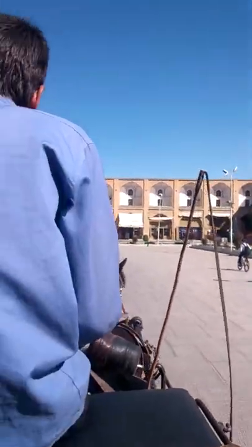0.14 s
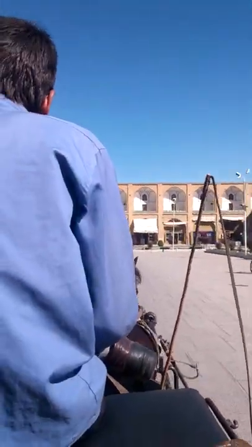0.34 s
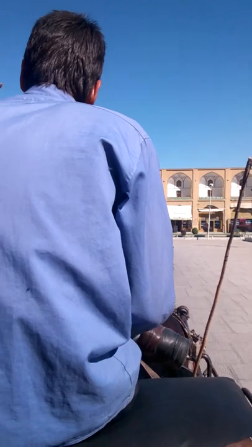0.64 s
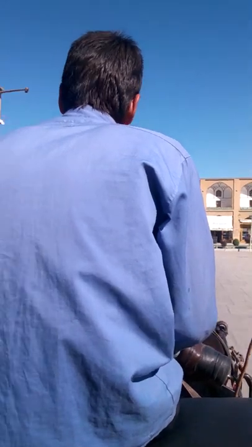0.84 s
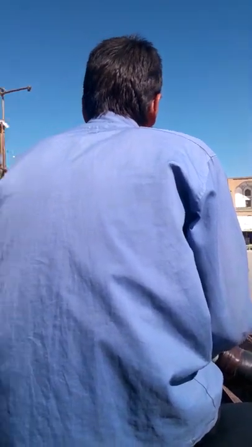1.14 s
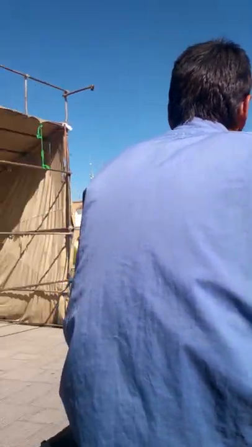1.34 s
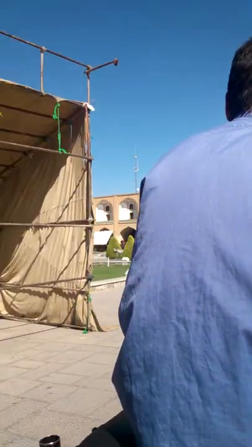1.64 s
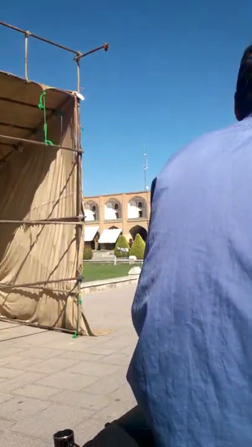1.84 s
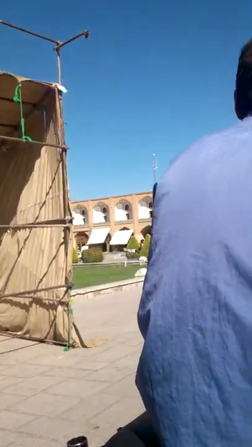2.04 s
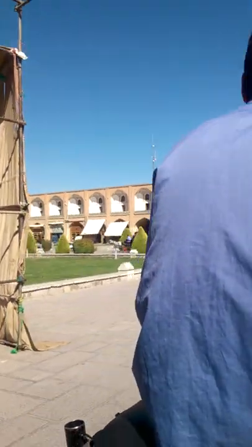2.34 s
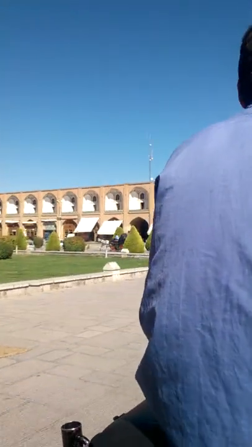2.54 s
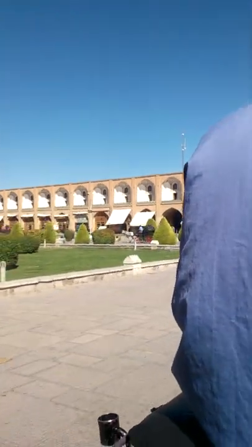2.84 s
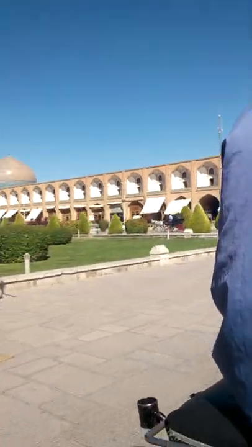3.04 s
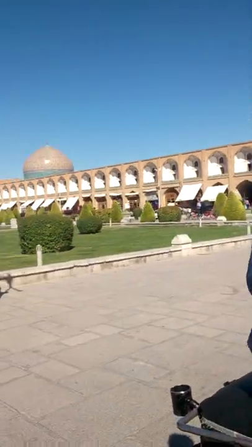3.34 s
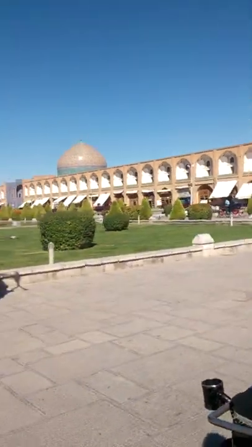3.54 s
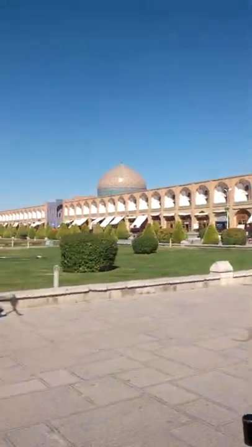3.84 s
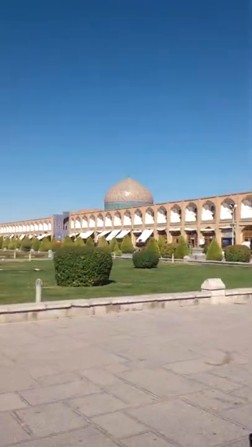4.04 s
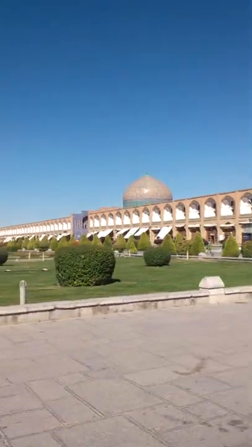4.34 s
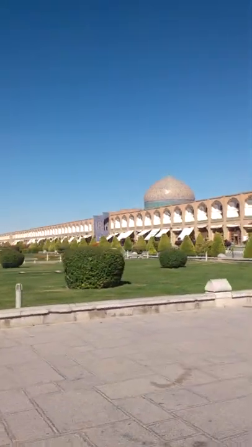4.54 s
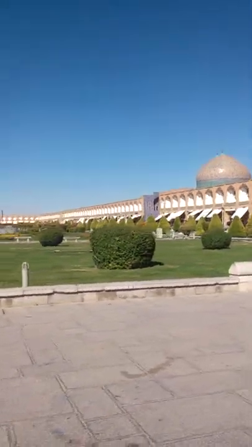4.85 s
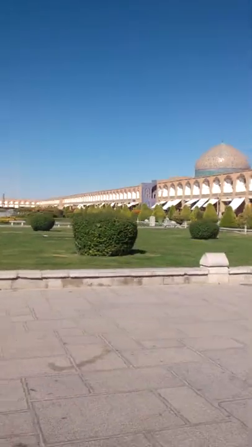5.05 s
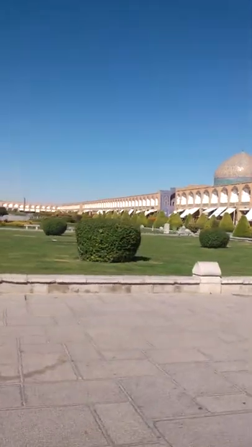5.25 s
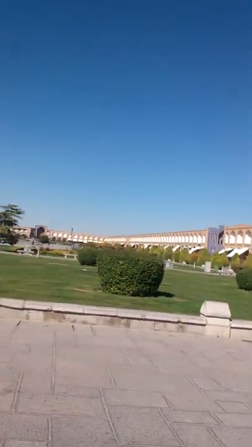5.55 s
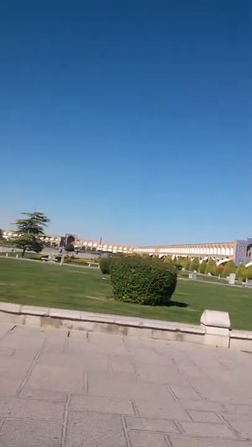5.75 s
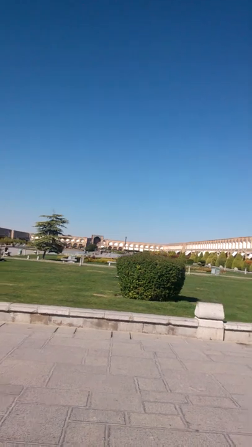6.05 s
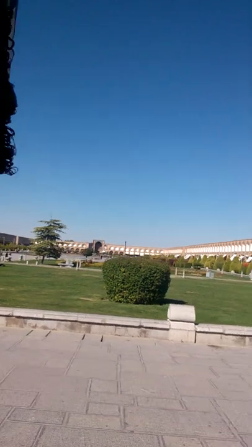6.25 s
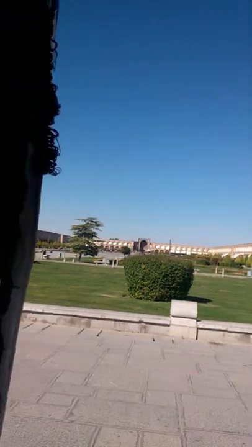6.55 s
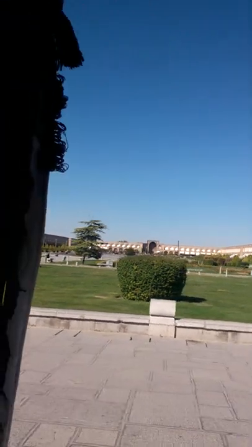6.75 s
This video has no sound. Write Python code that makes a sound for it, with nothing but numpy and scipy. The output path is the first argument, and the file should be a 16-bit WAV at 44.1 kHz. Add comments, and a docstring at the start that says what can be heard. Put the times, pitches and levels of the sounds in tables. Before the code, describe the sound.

A horse carriage rolls outdoors across stone paving, heard close from the passenger seat in stereo. Bright, dry bells and fine metal glints shake without pause above quick uneven clopping. Deep wind buffets either side of the microphone, heavily at first, then more sparsely. Gritty wheel noise over a soft low roll brings sharp pebble cracks on the right, the hardest near the end, while everything continues to the cut.

```python
"""A horse carriage rolls over stone paving, heard at a left and a right port, in wind from the start.
Six harness bells of decaying modes jingle at once over chinking chains; ringing hooves clop from 0.1 s.
Eddies, short low swings, thump at the ports most thickly before 3 s. From 1.1 s pebbles snap under the
right wheel, as short bursts of three fast-fading tones with noisy crumbs, in noise grit over a low roll;
the hardest snap comes near 5.7 s, the grit swells up to 6 s, and bells, steps and wind go on to the end."""
import sys
import numpy as np
from scipy import signal
from scipy.fft import rfft, irfft, next_fast_len
from scipy.io import wavfile
from scipy.ndimage import uniform_filter1d, map_coordinates

SR = 44100
rng = np.random.default_rng(int(sys.argv[2]) if len(sys.argv) > 2 else 0)


def generate_wav(signal):
    """Clip the signal to [-1, 1] and save it as 16-bit WAV at the path in sys.argv[1]."""
    frames = np.transpose(np.atleast_2d(signal))
    scaled = np.clip(frames, -1, 1) * 32767
    pcm = np.round(scaled).astype(np.int16)
    wavfile.write(sys.argv[1], SR, pcm)


N = 304290


def amp(db):
    """Gain of a level in dB."""
    return 10 ** (np.asarray(db) / 20)


def unit(x):
    """Each channel at rms 1."""
    return x / np.sqrt(np.mean(x ** 2, -1, keepdims=True) + 1e-20)


def curves(rows):
    """One value per sample for each column after the time."""
    s, *cols = np.transpose(rows)
    return [np.interp(np.arange(N) / SR, s, c) for c in cols]


def sides(pan_db):
    """Left and right gains that share a fixed power, from the left-right level in dB."""
    left = 1 / (1 + amp(-2 * np.asarray(pan_db)))
    return 2 * np.sqrt([left, 1 - left])


def wobble(rate):
    """A smooth random curve per port, rate knots a second."""
    knots = rng.standard_normal((2, int(N * rate / SR) + 4))
    return np.array([map_coordinates(k, [np.arange(N) * rate / SR]) for k in knots])


def filtered(x, response):
    """x times a response of frequency."""
    m = next_fast_len(N + 8192)
    return irfft(rfft(x, m) * response(np.fft.rfftfreq(m, 1 / SR)), m)[..., :N]


def coloured(x, spectrum):
    """x shaped by (Hz, dB) points on a log axis, rms 1."""
    f, db = np.transpose(spectrum)
    return unit(filtered(x, lambda hz: amp(np.interp(np.log(hz + 1), np.log(f), db))))


def add(track, s, sound):
    """Mixes a stereo sound in at s seconds."""
    part = track[:, max(round(s * SR), 0):][:, :sound.shape[1]]
    part += sound[:, :part.shape[1]]


# footfalls: (time [s], level [dB], hollow pitch [Hz], relative shoe ring [dB])
FOOTFALLS = [(0.097, -38, 1030, -19), (0.117, -35, 1070, -19), (0.266, -36, 1020, -20),
             (0.372, -38, 960, 19.5), (0.392, -30.5, 1140, 13), (0.672, -32.5, 956, -33),
             (0.78, -38, 800, -21), (0.968, -32.5, 990, -30), (1.26, -38, 890, -19), (1.425, -33, 676, -14),
             (1.554, -35, 1500, 6), (1.833, -30, 996, -6), (1.878, -33.5, 745, -24),
             (2.141, -43.5, 796, 12), (2.435, -31.5, 923, -18), (2.491, -37, 830, -16),
             (2.695, -44, 810, -23), (3.007, -34.5, 970, -21), (3.181, -34.5, 820, -23),
             (3.277, -32, 1170, -15), (3.35, -35.5, 900, 3), (3.585, -34, 1030, -25),
             (3.61, -35.5, 850, -20), (3.775, -35, 840, -23), (3.863, -36, 814, -10),
             (3.981, -37.5, 850, -21), (4.164, -34.5, 1034, -25), (4.196, -38, 840, -23),
             (4.343, -36.5, 694, -21), (4.433, -33, 1284, -24), (4.733, -38, 1030, -17),
             (5.008, -36.5, 1250, -28), (5.29, -35, 990, 2), (5.537, -39, 974, -8.5), (5.58, -31, 1270, 5),
             (5.86, -34, 950, -29), (5.882, -41, 1030, -29), (6.156, -30, 1230, -25),
             (6.444, -35, 940, -36), (6.594, -36.5, 966, -14), (6.727, -29.5, 1250, -21)]
# a shoe slides on the stone: (time [s], level [dB], length [s])
SHOE_SKIDS = [(0.364, -30, 0.044), (1.405, -37, 0.072), (1.829, -30, 0.027), (3.582, -36, 0.026),
              (4.424, -41, .04), (5.961, -37, 0.064), (6.154, -34, 0.023)]
SHOE_HZ, SHOE_T60 = 1774, 0.15  # shoe ring: pitch [Hz], decay by 60 dB [s]
HOOF_PAN_DB, STRAY_DB = 6.5, 10  # the horse is a little to the left; single steps stray from it
HEEL_S, HEEL_DB, HEEL_PITCH = 0.012, 3.5, 0.66  # the heel lands first [s], level [dB], pitch ratio


def hooves():
    """The hollow hoof rings for a few cycles, stone gives a puff, the shoe a short note; some steps skid."""
    out, t = np.zeros((2, N)), np.arange(SR // 8) / SR
    puff_band = signal.butter(N=2, Wn=[550, 2000], btype="band", fs=SR)
    for s, db, hz, shoe_db in FOOTFALLS:
        hollow = 1.6 * np.sin(2 * np.pi * hz * t)
        hollow += 0.4 * np.sin(2 * np.pi * rng.uniform(1.3, 1.6) * hz * t)
        hollow += 0.5 * np.sin(2 * np.pi * rng.uniform(0.55, 0.75) * hz * t)
        clop = amp(-60 * t / 0.034) * hollow
        heel = amp(HEEL_DB - 60 * t / 0.013) * np.sin(2 * np.pi * HEEL_PITCH * hz * t)
        clop += 0.14 * np.pad(clop, (rng.integers(60, 300), 0))[:len(t)]  # the shoe rocks once
        grains = rng.standard_normal((2, len(t))) * (0.6 + 5 * (rng.random(len(t)) < 0.02))
        puff_shape = amp(-60 * t / 0.2) * (1 - np.exp(-t / 0.0023))
        puff = 1.4 * puff_shape * signal.lfilter(*puff_band, grains)
        scrape_shape = amp(-60 * t / 0.031) * (1 - np.exp(-t / 0.0043))
        scrape = 0.11 * scrape_shape * rng.standard_normal((2, len(t)))
        shoe = amp(shoe_db - 15.0 - 60 * t / SHOE_T60) * np.sin(2 * np.pi * SHOE_HZ * t)
        rise = 1 - np.exp(-t / 0.0007)
        gain = amp(db) * sides(rng.normal(HOOF_PAN_DB, STRAY_DB))[:, None] * rise
        add(out, s - HEEL_S, gain * (heel + 0.5 * puff[::-1]))  # the reversed puff swells
        add(out, s, gain * (clop + puff + scrape + shoe))
    skid_band = signal.butter(N=2, Wn=[900, 6000], btype="band", fs=SR)
    for s, db, length in SHOE_SKIDS:
        grains = rng.standard_normal((2, len(t))) * (0.5 + 4 * (rng.random(len(t)) < 0.03))
        arch = np.sqrt(np.abs(np.sin(np.pi * np.clip(t / length, 0, 1))))
        add(out, s, amp(db) * arch * signal.lfilter(*skid_band, grains))
    return out


# modes of each of the six bells: (pitch [Hz], ...)
BELL_MODE_HZ = [
    [3050, 3092, 3140, 8247, 8680, 12900, 13175, 14095, 15000],
    [2182, 2250, 4983, 7497, 9272],
    [4142, 7860],
    [3647],
    [2785, 2494],
    [10585],
]
# how these modes ring, bell by bell: (relative level [dB], decay by 60 dB [s], left-right [dB])
BELL_MODES = [
    [(4.5, 0.039, -6.5), (4, 0.12, -7), (-5, 0.095, 14), (0.5, 0.18, -11), (1, 0.067, -4), (-7, 0.06, 4),
     (-7, 0.12, 7), (-1, 0.14, 1), (-13, 0.05, -3)],
    [(-1.5, 0.26, 7), (-1, 0.069, -25), (-8.5, 0.13, -6), (-5, 0.31, -14), (3.5, 0.017, 20)],
    [(4.5, 0.061, -4), (-18, 0.063, -16)],
    [(5.5, 0.071, -4)],
    [(11.5, 0.12, -4), (-9, 0.12, -27)],
    [(7.5, 0.088, 8)],
]
# clear blows of the pellet, bell by bell: (time [s], level [dB]);
# the first bell also has (overtone brightness [dB])
PELLET_BLOWS = [
    [(0.0154, -22.5, -17), (0.1705, -24.5, -3.5), (0.1835, -21.5, -5), (0.2334, -32, 3), (0.2488, -30, -18),
     (0.2952, -29, -11), (0.3346, -26, -24), (0.4414, -24, -7), (0.5676, -26.5, -9), (0.629, -33, -15),
     (0.728, -29.5, -5), (0.7562, -21, -3), (0.7826, -20, -3), (0.8375, -21.5, -11), (0.8689, -48, -2),
     (0.9063, -32.5, -7.5), (1.058, -33, -5), (1.2979, -31, -20), (1.3134, -22.5, -7), (1.352, -25, -2),
     (1.4346, -35, -3), (1.4696, -37, -10), (1.6003, -18.5, -15.5), (1.645, -29, -18), (1.7544, -23, -29),
     (1.7828, -33, -10), (1.915, -30, -17), (1.926, -24, -0.5), (2.0098, -28.5, -11), (2.0467, -24, -32),
     (2.0797, -21, -14.5), (2.118, -36, -17), (2.2114, -32.5, -19), (2.3291, -37, -10), (2.3456, -24, -15),
     (2.4099, -25.5, -7.5), (2.5152, -24.5, -11.5), (2.5626, -28, -11), (2.59, -27, -19),
     (2.9302, -26.5, -34), (2.9711, -27, -12), (3.0594, -29, -16), (3.1737, -31, -4), (3.5029, -22, -10),
     (3.603, -33.5, 5.5), (3.6621, -31, -10), (3.677, -18.5, -7.5), (3.815, -42, 3), (4.0682, -32, -23),
     (4.0871, -27, -20), (4.2283, -32.5, -1), (4.3271, -31, -2.5), (4.5087, -25, -14),
     (4.6493, -30.5, -7.5), (4.779, -49, -8), (4.795, -22, -5), (4.8179, -34, 7.5), (4.9082, -31, 0.5),
     (4.9496, -32, -26), (5.002, -35, -15), (5.0893, -26, -19), (5.237, -34.5, -15), (5.29, -34, -15),
     (5.3847, -19.5, -12), (5.45, -38, -12), (5.4839, -32.5, -14), (5.86, -38, -15), (5.9449, -28.5, -14),
     (6.0192, -24.5, -22), (6.034, -24.5, -20), (6.0846, -33, -21), (6.2297, -30, -16), (6.3664, -28, -14),
     (6.4163, -30, -7), (6.5221, -29.5, 0), (6.6353, -31, -15), (6.7, -37.5, -17)],
    [(0.184, -34), (0.3127, -26.5), (0.4743, -31.5), (0.7746, -27), (0.8774, -35), (1.665, -42),
     (1.6965, -36), (1.76, -34), (2.495, -35), (3.028, -32.5), (3.1971, -33), (3.6721, -32), (4.2308, -31),
     (4.3505, -31), (4.59, -36), (4.68, -43), (4.757, -36.5), (4.7885, -31), (4.8179, -27), (4.9097, -38),
     (4.955, -34), (5.3946, -35), (5.4316, -33), (5.9823, -33), (6.0656, -33), (6.092, -31), (6.535, -30.5),
     (6.6, -32)],
    [(0.0528, -32), (0.1875, -27.5), (1.055, -13), (1.1, -29), (1.158, -30.5), (1.19, -30), (1.3543, -18.5),
     (1.4172, -29), (1.6462, -25), (1.698, -32), (1.75, -33), (2.2194, -27.5), (2.2648, -25.5),
     (2.328, -40), (2.396, -38), (2.7277, -33.5), (2.7836, -22.5), (4.2896, -30.5), (4.59, -35),
     (4.8025, -35), (5.0933, -24.5), (5.1432, -28), (6.8613, -33)],
    [(0.2354, -29), (0.42, -32), (0.6265, -37), (0.8056, -40), (0.8639, -39), (1.2595, -30), (1.4057, -32),
     (1.82, -31), (2.0966, -40), (4.2772, -30), (4.49, -42), (5.42, -37), (6.0472, -40)],
    [(0.7926, -38), (0.836, -36), (1.7005, -40.5), (1.7529, -37), (1.929, -34), (2.2787, -34), (2.325, -37),
     (2.51, -38), (2.595, -36), (2.6589, -33), (2.7965, -37.5), (2.8409, -44), (3.684, -40), (4.2258, -45),
     (4.2482, -33), (4.816, -37), (5.9628, -41)],
    [(0.19, -35.5), (0.2334, -37), (0.6325, -46), (0.6809, -38), (0.865, -47), (2.0188, -40), (2.4104, -48),
     (2.8709, -39.5), (2.9896, -33), (3.1318, -42), (3.4456, -31), (3.5538, -45), (4.0003, -42),
     (4.14, -44), (6.0162, -41)],
]
# faint rolling of the pellet between blows, one per bell: (level relative to the shaking [dB])
ROLLING_DB = [-4, -15, -9.5, -19, -16, -19]
# sway of the harness, for bells and chains: (time [s], left-right [dB], shaking [dB])
HARNESS_SHAKE = [(0.0, 20, -41), (0.44, 12, -40), (0.73, 22, -42), (1.04, 11, -38), (1.58, 9, -41),
                 (2.4, 11, -40.5), (3.48, 11, -44), (3.82, 9.5, -42), (6.69, 8, -50), (6.9, 17, -47)]
REBOUND_S, REBOUND_DB = 0.03, -15  # the pellet falls back: time scale of the wait [s], loss [dB]
PORT_LAG = np.array([[0], [np.pi / 2]])  # the bells reach the ports about a quarter cycle apart [rad]


def bells():
    """Each blow drives every mode of its bell at a new strength and phase; the pellet rolls in between."""
    pan_db, shake_db = curves(HARNESS_SHAKE)
    out, t = np.zeros((2, N)), np.arange(N) / SR
    for mode_hz, modes, strikes, rattle_db in zip(BELL_MODE_HZ, BELL_MODES, PELLET_BLOWS, ROLLING_DB):
        strikes = np.array(strikes, float)
        again = strikes + np.eye(strikes.shape[1])[1] * REBOUND_DB  # only the level column drops
        again[:, 0] += REBOUND_S * (0.22 + rng.exponential(size=len(again)))
        again = again[again[:, 0] < (N - 1) / SR]
        s, db, *bright_db = np.r_[strikes, again].T
        draw = rng.random((700, 2))  # 700 rolling touches
        when = np.r_[s * SR, draw[:, 0] * (N - 1)].astype(int)
        rolling_db = rattle_db + shake_db[when[len(s):]] - 3.2 * np.log(draw[:, 1] + 0.01)
        phase = 2 * np.pi * rng.random(len(when))  # a blow starts all modes together
        for hz, (mode_db, t60, mode_pan) in zip(mode_hz, modes):
            overtone = hz > 4500
            soft = 130 + 250 * overtone  # soft contact [samples], overtones swell later
            chance = rng.standard_normal((len(when), 3))
            blow_db = db + overtone * (0.5 + sum(bright_db))
            size_db = np.r_[blow_db, rolling_db - 13 * overtone] + mode_db - 10.5
            size_db += (2 + 2.5 * overtone) * chance[:, 0]
            turn = 1j * phase + 0.3j * chance[:, 1:].T + 1j * PORT_LAG
            blows = np.zeros((2, N), complex)
            blows[:, when] = amp(size_db) * np.exp(turn)
            envelope = signal.lfilter([1], [1, -amp(-60 / t60 / SR)], blows)
            envelope += 0.24 * signal.lfilter([1], [1, -amp(-26 / t60 / SR)], blows)  # fainter, longer tail
            real = uniform_filter1d(envelope.real, size=soft, origin=40)
            imag = uniform_filter1d(envelope.imag, size=soft, origin=40)
            # the pellet touches the swinging shell: level and phase waver
            sway = wobble(60)
            waver = (1 + 0.7 * overtone) * (0.9 * sway.mean(0) + 0.4 * sway[::-1])
            envelope = (real + 1j * imag) * amp(2.2 * sway) * np.exp(1j * waver)
            ringing = (envelope * np.exp(2j * np.pi * hz * t)).real
            out += sides(pan_db * (1 - overtone) + mode_pan) * ringing  # overtones ignore the harness pan
    return out


# small metal parts: (middle pitch [Hz], spread in log pitch [ratio], decay by 60 dB [s])
BUCKLE_CHINK = (3150, .26, 0.048)  # buckles and chain links
LINK_CLINK = (2750, 0.147, 0.041)  # links thrown together by a jolt
STUD_GLINT = (9300, 0.31, 0.057)  # rings and studs
# wash of fine metal after a blow: (frequency [Hz], level per Hz [dB])
SHIMMER_COLOUR = [(5000, -7), (7000, -15), (8500, 18), (9800, -7), (11500, -15), (13000, 14), (14300, -6),
                  (15500, -18)]
GLINT_DB = -11.5  # loose glints, relative to the shaking
JOLT_GLINT_DB, JOLT_CHINK_DB = -16.5, -12  # after a blow, relative to it
SETTLE_S = 0.04  # mean wait of a fitting after a blow


def chains():
    """Harness fittings chink and glint all along, and in clusters after each blow on the first bell."""
    pan_db, shake_db = curves(HARNESS_SHAKE)
    s, db, bright_db = np.transpose(PELLET_BLOWS[0])

    def at(curve, times):
        """Value of a curve at given times."""
        return curve[np.minimum((times * SR).astype(int), N - 1)]

    def after(count):
        """Times of count fittings that settle after each blow."""
        return (s[:, None] + SETTLE_S * rng.exponential(size=(len(s), count))).ravel()

    loose, loose_high = rng.random(size=2000) * N / SR, rng.random(size=2400) * N / SR
    low, high = after(count=8), after(count=20)
    low_db = np.repeat(db, repeats=8) + JOLT_CHINK_DB
    high_db = np.repeat(db + bright_db, repeats=20) + JOLT_GLINT_DB
    out = pings(loose, at(shake_db, loose), at(pan_db, loose), BUCKLE_CHINK, count=900)
    out += pings(low, low_db, at(pan_db, low), LINK_CLINK, count=900)
    out += pings(loose_high, at(shake_db, loose_high) + GLINT_DB, -1.3, STUD_GLINT, count=1800)
    out += pings(high, high_db, -1.5, STUD_GLINT, count=1800)
    jolts = np.bincount((s * SR).astype(int), amp(db + bright_db - 14.0), N)
    shimmer = np.abs(signal.fftconvolve(jolts, np.hanning(300))[:N]) / 150
    shimmer = signal.lfilter([1], [1, -amp(-60 / 0.24 / SR)], shimmer)
    return out + shimmer * sides(1)[:, None] * coloured(rng.standard_normal((2, N)), SHIMMER_COLOUR)


SCATTER_DB = 3  # strength varies from note to note


def pings(s, db, pan_db, kind, count):
    """Short decaying notes (count samples) of small metal parts at scattered pitches and strengths."""
    hz, spread, t60 = kind
    t, draw = np.arange(count) / SR, rng.standard_normal((len(s), 3))
    pitch = np.clip(hz * np.exp(spread * draw[:, :1]), 1500, 20000)
    shape = amp(-60 * t / t60) * (1 - np.exp(-t / 0.0095))
    notes = amp(db + SCATTER_DB * draw[:, 1])[:, None] * shape * np.sin(2 * np.pi * pitch * t)
    where = ((s * SR).astype(int)[:, None] + np.arange(count)).ravel()
    gains = sides(pan_db + 7 * draw[:, 2])
    return np.array([np.bincount(where, (g[:, None] * notes).ravel(), N)[:N] for g in gains])


# grit under the right wheel: (time [s], relative level [dB])
GRIT_LEVEL = [(0.0, -43), (0.25, -43.5), (0.84, -42.5), (1.07, -44), (1.45, -43.5), (1.7, -44.5),
              (1.9, -40), (2.11, -45), (2.35, -40), (2.58, -46), (2.9, -44), (3.13, -36.5), (3.4, -44.5),
              (3.63, -41.5), (4.27, -40), (4.7, -46), (4.9, -40.5), (5.57, -34.5), (5.9, -41.5),
              (5.98, -33), (6.08, -33), (6.18, -41), (6.9, -37.5)]
# colour of the grit: (frequency [Hz], level per Hz [dB])
GRIT_COLOUR = [(1500, -11), (3000, 3.5), (4500, -1.5), (6000, -0.5), (8000, 10), (9500, 4.5), (11500, -4.5),
               (15500, -6.5), (17000, -37)]
# colour of the wheels and the square: (frequency [Hz], level per Hz [dB])
ROLL_COLOUR = [(200, 11.5), (450, 11.5), (700, 4.5), (1000, 6), (1600, 0), (3000, -9.5), (5000, -8.5),
               (9000, -21), (15500, -39)]
# pebbles snap: (time [s], level [dB])
PEBBLE_SNAPS = [(1.146, -34), (1.459, -23.5), (1.8336, -19), (1.873, -23), (2.492, -20), (3.1006, -31),
                (3.15, -18), (3.1823, -21.5), (3.3496, -19), (3.5913, -17), (3.767, -25), (3.775, -22.5),
                (4.0567, -25), (4.1977, -25), (4.434, -22), (4.597, -30), (4.667, -32), (4.8334, -28),
                (4.9416, -20), (4.957, -21.5), (5.0928, -25), (5.1392, -19.5), (5.1776, -32), (5.3833, -13),
                (5.421, -23), (5.5333, -28), (5.58, -18.5), (5.663, -7.5), (5.7483, -19), (5.7836, -22),
                (5.8436, -30), (5.9658, -22), (6.595, -21), (6.72, -30), (6.861, -19.5)]
CRACK_PAN_DB = -14  # under the right wheel
SNAP_HZ, DB_PER_OCTAVE = 4300, 32  # middle pitch of a snap at 0 dB; fainter (smaller) pebbles snap higher


def wheels():
    """Dense grains of grit on a steady roll; now and then a pebble snaps."""
    grit_db, = curves(GRIT_LEVEL)
    spikes = (rng.random((2, N)) < 0.006) * rng.exponential(size=(2, N))
    grains = rng.standard_normal((2, N)) * (1 + 1.5 * spikes)
    grains *= amp(1.5 * wobble(30) + 2.1 * wobble(70))
    # the left port hears the grit fainter and steadier
    out = amp([0.13 * grit_db - 44.0, grit_db + 2.5]) * coloured(grains, GRIT_COLOUR)
    roll = rng.standard_normal((2, N)) + 1.07 * rng.standard_normal(N)  # partly alike at both ports
    roll *= amp(2.8 * wobble(90)[0])
    out += amp(-45.5 + 1.1 * wobble(5.6) + 1.45 * wobble(16)) * coloured(roll, ROLL_COLOUR)
    t = np.arange(SR // 40) / SR
    band = signal.butter(N=2, Wn=[3500, 10500], btype="band", fs=SR)
    for s, db in PEBBLE_SNAPS:
        hz = SNAP_HZ * 2 ** (-db / DB_PER_OCTAVE)
        tones = sum(np.sin(2 * np.pi * hz * k * t) for k in rng.uniform(0.7, 1.5, size=3)) / 1.7
        snap = amp(-60 * t / 0.0043) * (1 - np.exp(-t / 0.00032)) * tones
        crumbs = 0.35 * amp(-60 * t / 0.016) * signal.lfilter(*band, rng.standard_normal((2, len(t))))
        add(out, s, amp(db) * sides(CRACK_PAN_DB)[:, None] * (snap + crumbs))
    return out


# gusts: (time [s], strength [dB], left-right [dB])
GUSTS = [(0.0, -22, -4), (0.06, -24.5, -16), (0.13, -23.5, -1), (0.4, -30, -2), (0.46, -24, 7),
         (0.59, -33, -4.5), (0.92, -23, 10.5), (1.02, -34, -1.5), (1.22, -24, 1), (1.46, -23.5, 13),
         (1.59, -23, 1), (1.63, -21.5, 10.5), (1.84, -22, 12), (1.9, -29.5, 4), (2.0, -21, 7.5),
         (2.06, -23, 7), (2.19, -25, 12), (2.29, -26, 3), (2.63, -30, 2.5), (2.71, -20, 14), (2.8, -30, 0),
         (2.92, -23, 9.5), (3.88, -31.5, 0), (4.04, -21.5, 11), (4.11, -30, -4.5), (4.48, -19.5, -3),
         (4.52, -27.5, 2), (6.65, -27.5, 4), (6.69, -25.5, 12), (6.9, -23, -4.5)]
# eddies that hit a port: (time [s], level [dB], left-right [dB], swing pitch [Hz])
EDDIES = [(0.037, -2, -31, 197), (0.219, -16.5, -45, 250), (0.272, -19.5, -42, 152), (0.285, -13, -25, 177),
          (0.31, -20.5, -24, 294), (0.893, -16.5, 33, 156), (1.21, -19.5, 17, 150), (1.319, -32, -10, 170),
          (1.38, -16, 9, 99), (1.411, -13.5, 23, 148), (1.513, -22, 13, 107), (1.745, -31, 17, 131),
          (1.799, -23, 15, 150), (1.438, -11.5, 25, 192), (1.629, -18, 20, 239), (1.649, -10.5, 10, 137),
          (1.827, -10.5, 11, 109), (1.856, -11.5, 26, 170), (1.877, -9.5, 21, 147), (1.98, -6, 26, 166),
          (2.092, -10.5, 25, 174), (2.131, -9.5, 19, 145), (2.175, -9, 34, 152), (2.222, -15.5, 29, 173),
          (2.457, -14.5, 13, 186), (2.742, -10, 32, 148), (3.196, -23, 0, 152), (4.001, -14.5, 23, 195),
          (4.342, -19.5, -42, 154), (4.436, -25, 11, 166), (4.539, -17, 29, 310), (6.132, -18.5, 13, 167),
          (6.694, -17, 15, 149), (6.856, -19, -29, 160)]
# colours of the deep buffeting, the flutter above it and the rough wake of an eddy:
# (frequency [Hz], level per Hz [dB])
BUFFET_COLOUR = [(15, -62), (30, -32), (50, -5.5), (75, -1), (110, -4.5), (160, -14), (260, -31),
                 (500, -61)]
FLUTTER_COLOUR = [(60, -16), (130, -5), (190, 5), (280, -2.5), (400, -11), (600, -21), (1000, -27.5),
                  (2500, -44.5)]
WAKE_COLOUR = [(50, -11), (100, 3), (200, 1), (350, -2), (550, -17), (900, -36), (2000, -49)]
GUSTY_DB, GUSTS_PER_S = 1.5, 8  # quick lulls and swells, each port its own
SHARED = 0.59  # buffeting noise common to both ports, against 1 of each port's own
EDGE_DB, EDGE_PER_PAN, EDGE_HZ = -13, -0.43, 348  # sharp edge of an eddy, sharper on the right (dB per dB)
WAKE_DB, WAKE_S = -14, 0.012  # rough flutter around each eddy: relative level, width


def wind():
    """Turbulence differs from port to port, a stronger gust flutters more; eddies give one or two big swings."""
    strength_db, pan_db = curves(GUSTS)
    gust_db = strength_db + 20 * np.log10(sides(pan_db)) + GUSTY_DB * wobble(GUSTS_PER_S)
    lumps = wobble(22)
    turbulence = rng.standard_normal((2, N)) + SHARED * rng.standard_normal(N)
    buffet = unit(amp(1.23 * lumps) * coloured(turbulence, BUFFET_COLOUR))
    patches = amp(2.5 * lumps + 4.5 * wobble(60))
    flutter = unit(patches * coloured(rng.standard_normal((2, N)), FLUTTER_COLOUR))
    out = amp(gust_db) * (buffet + amp(0.057 * (gust_db + 25.0) - 10.0) * flutter)
    wake = coloured(rng.standard_normal((2, N)), WAKE_COLOUR)
    for s, db, pan_db, hz in EDDIES:
        gains = sides(pan_db)[:, None]
        turn = np.arange(-1.5 * SR / hz, 2.5 * SR / hz) * hz / SR - 0.6  # in cycles of the swing
        swing = np.exp(-(turn / 0.6) ** 2) * np.cos(2 * np.pi * turn + rng.uniform(0, 2 * np.pi))
        edge = np.cos(2 * np.pi * EDGE_HZ / hz * turn + rng.uniform(0, 2 * np.pi))
        edge *= np.exp(-(turn / hz / 0.00093) ** 2)
        swing += amp(EDGE_DB + EDGE_PER_PAN * pan_db) * edge
        add(out, s - 1.512 / hz, amp(db) * gains * swing)
        near = np.clip(round(s * SR) + np.arange(-1500, 2500), 0, N - 1)
        hump = np.exp(-((near / SR - s - 0.005) / WAKE_S) ** 2)
        out[:, near] += amp(db + WAKE_DB) * gains * hump * wake[:, near]
    return out


def scene():
    """Everything around the passenger seat."""
    return hooves() + bells() + chains() + wheels() + wind()


TOP_HZ = 15840  # band limit


def record(dry):
    """Peaks are rounded off softly below full scale; nothing above the band limit is kept."""
    soft = dry / (1 + np.abs(dry) ** 8) ** (1 / 8)
    return filtered(soft, lambda hz: hz < TOP_HZ)


dry = scene()
out = record(dry)
generate_wav(out)
```